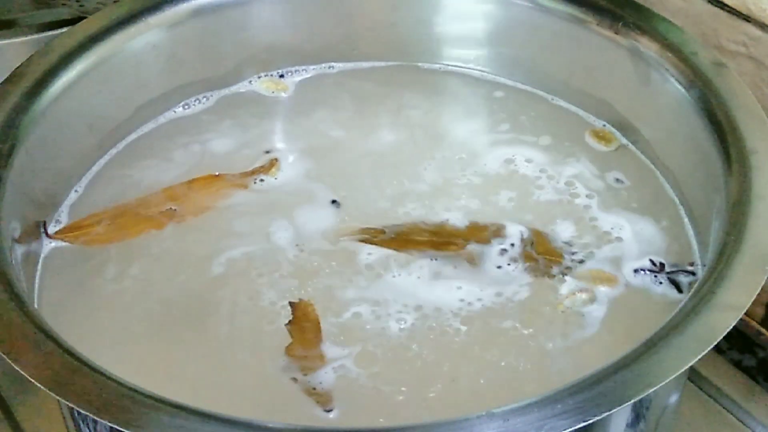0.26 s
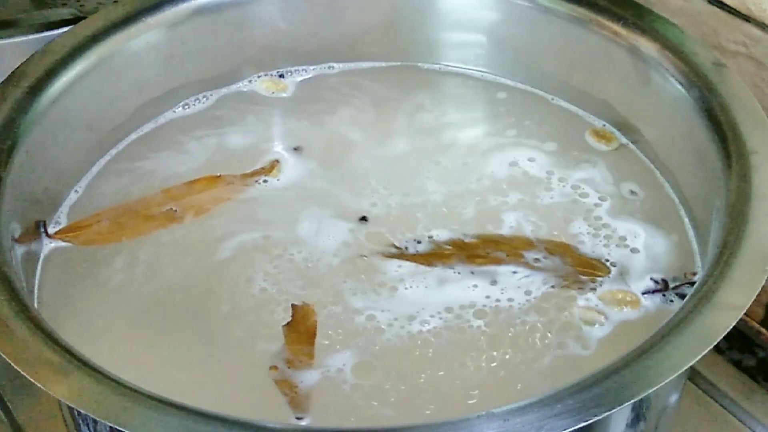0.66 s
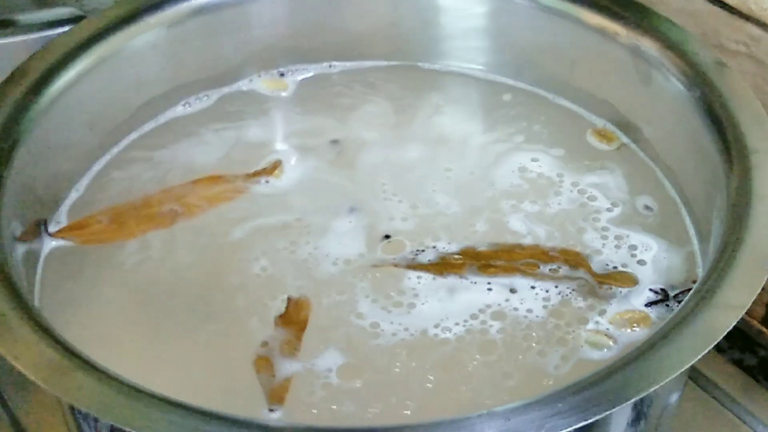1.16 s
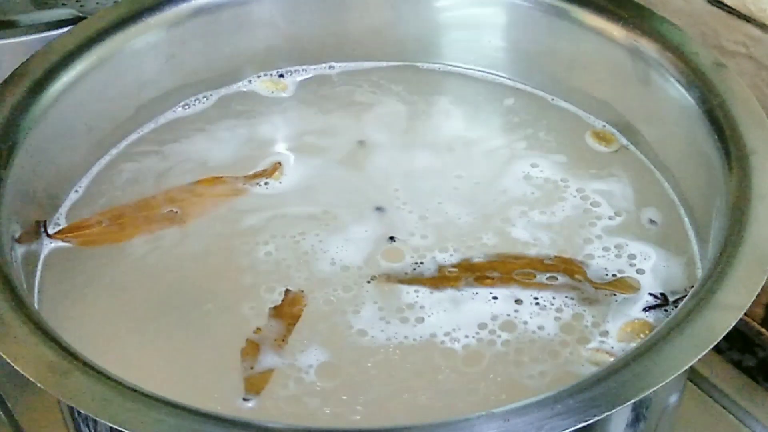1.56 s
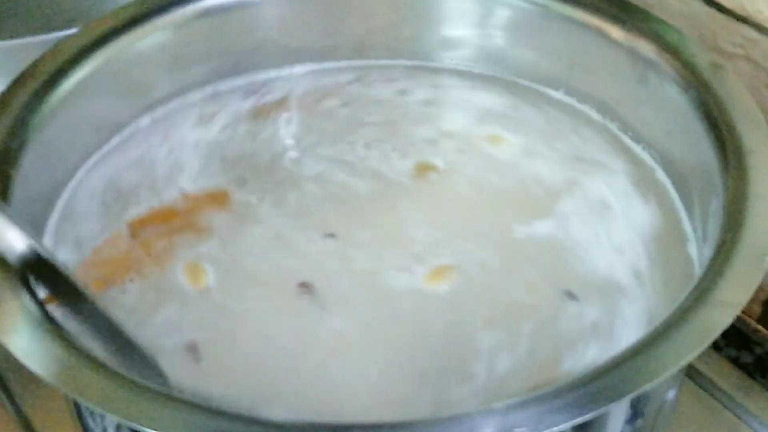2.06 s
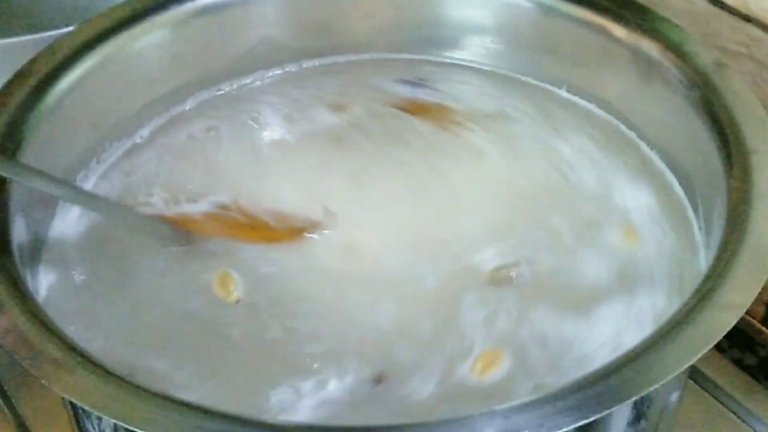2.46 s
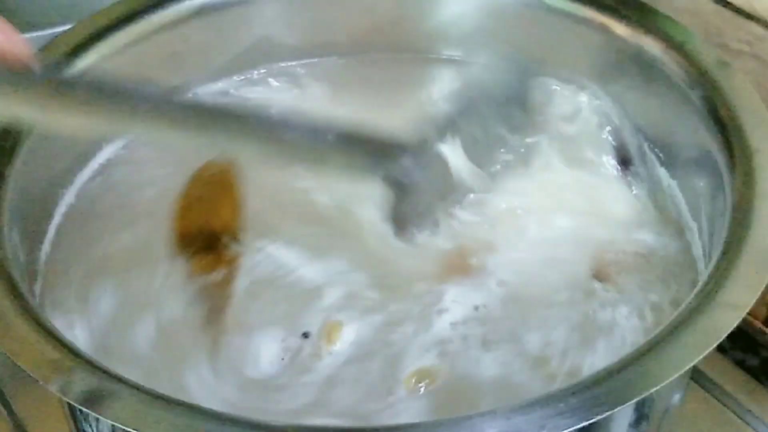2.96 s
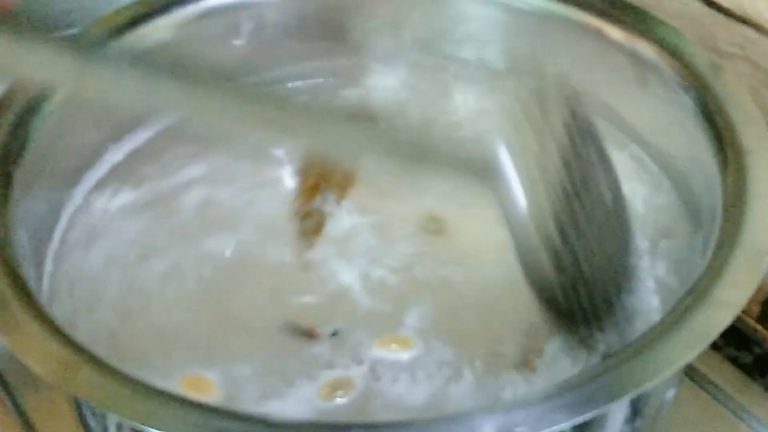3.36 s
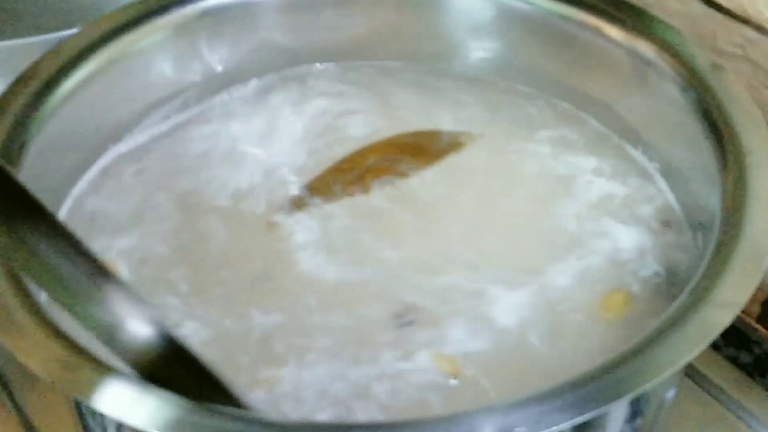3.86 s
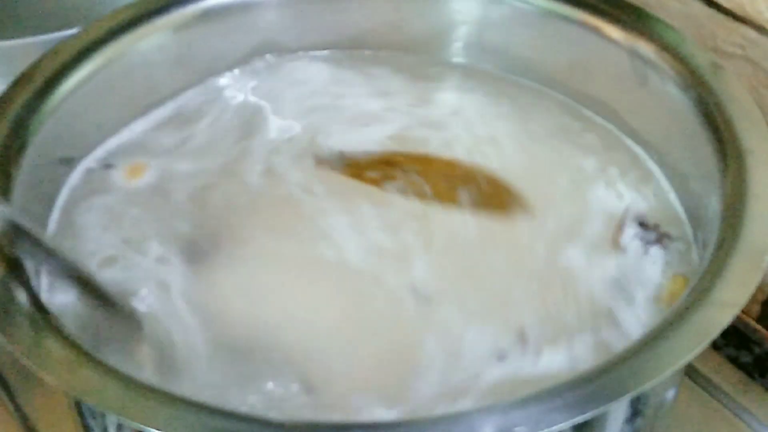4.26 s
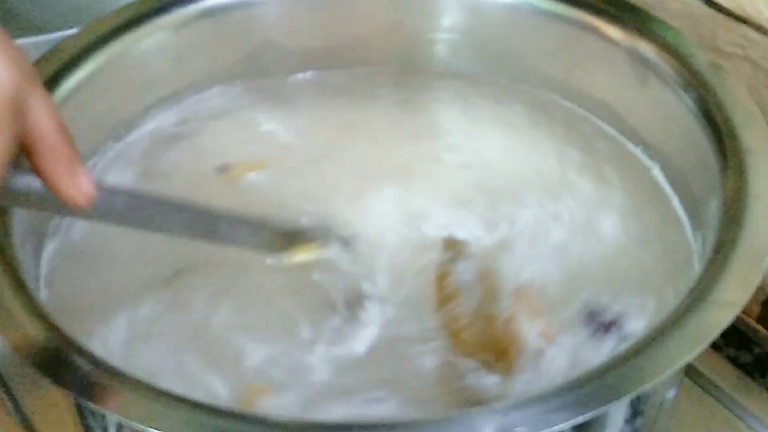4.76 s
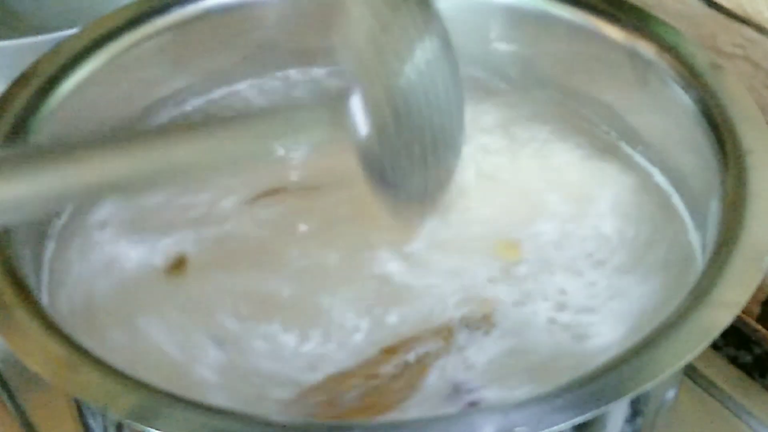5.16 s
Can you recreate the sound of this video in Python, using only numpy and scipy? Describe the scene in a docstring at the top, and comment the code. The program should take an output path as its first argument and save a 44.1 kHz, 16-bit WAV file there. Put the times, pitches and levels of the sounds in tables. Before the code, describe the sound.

Close-up kitchen stirring: bright steel taps and scratchy strokes against a pot, with soft watery pops over a thin, uneven simmer.

```python
"""Ladle scraping in a simmering pot

A steel ladle scrapes and clinks in a steel pot of simmering water and rice, close to a phone in a kitchen.
The water is uneven filtered noise, with short low pops, rising in pitch, where bass peaks break through the
gate; the steel is noise through resonances that wander at random, and struck modes that ring and decay.
The phone's noise suppressor thins what stays under its threshold, the bass is spared, and twice the sound
drops out for a moment."""
import sys
import numpy as np
from scipy import signal
from scipy.fft import rfft, irfft
from scipy.io import wavfile
from scipy.ndimage import uniform_filter1d

SR = 44100
rng = np.random.default_rng(int(sys.argv[2]) if len(sys.argv) > 2 else 0)


def inscribe(sig):
    """Save sig as 16-bit PCM at rate SR to the path in sys.argv[1].

    A 1-D sig is mono; a 2-D sig holds one channel per row.
    Samples are clipped to [-1, 1] before scaling.
    """
    pcm = np.round(np.clip(np.atleast_2d(sig).T, -1, 1) * 32767)
    wavfile.write(sys.argv[1], SR, pcm.astype(np.int16))


N = 239066  # length in samples


def undb(db):
    """dB to gain."""
    return 10 ** (np.asarray(db) / 20)


def unit(x):
    """Scaled to rms 1."""
    return x / np.sqrt(np.mean(x ** 2))


def band(x, lo_hz, hi_hz, order=5):
    """Band-pass between two frequencies."""
    edges = [lo_hz, min(hi_hz, .45 * SR)]
    return signal.sosfilt(signal.butter(order, edges, "band", fs=SR, output="sos"), x)


def gains(spans):
    """Gain curve from (from s, to s, start dB, end dB) spans; overlapping spans add their power."""
    t = np.arange(N) / SR
    power = np.zeros(N)
    for start, end, start_db, end_db in spans:
        inside = (t >= start) & (t < end)
        power[inside] += undb(np.linspace(start_db, end_db, num=inside.sum())) ** 2
    return uniform_filter1d(np.sqrt(power), size=70)


def flicker(rate, spread_db):
    """A gain that wanders at random in dB: random steps, rate per second, smoothed twice."""
    k = int(SR / rate)
    steps = np.repeat(rng.standard_normal(N // k + 1), k)
    smooth = uniform_filter1d(uniform_filter1d(steps, k), k)[:N]
    return undb(0.91 * spread_db * smooth)


def resonate(x, modes, between_db):
    """Resonance peaks over an even response."""
    f = np.fft.rfftfreq(N, 1 / SR)
    peaks = sum(undb(db) / (1 + 2j * (f - hz) / width) for hz, width, db in modes)
    return irfft(rfft(x) * (undb(between_db) + peaks), N)


def add(out, s, x):
    """Mix x into out from time s."""
    i = int(s * SR)
    out[i:i + len(x)] += x[:N - i]


# Spectrum of the boil. Each row: frequency in Hz, relative level in dB.
RUMBLE_SPECTRUM = [(15, -61), (25, -33), (61, -10), (135, -9), (212, -9), (251, -10.5), (302, -8.5),
                   (690, -15), (1400, -12.5), (1820, -64), (3080, -120)]
# Resonances of the water. Each row: frequency in Hz, width in Hz, relative level in dB.
WATER_MODES = [(146.7, 9.2, -4), (191, 10, -7.5), (251.1, 16, 2), (442, 2.5, -18.5), (609, 12, -10),
               (830, 2.6, -5.5)]
# Steps in the level of the water sound, as the recorder's gate opens and closes, each held until the next.
# Each row: start in seconds, rumble level in dB, gurgle and fine gurgle levels in dB relative to the rumble.
WATER_STEPS = [(0.0, -52.5, -26, -21), (0.065, -51, -27, -30), (0.236, -48, 2, -36),
               (0.377, -56.5, -18, -27.5), (0.795, -49.5, -24.5, -23.5), (1.214, -50, -13, -10.5),
               (1.331, -58.5, -25, -25), (1.735, -47, 0, -4), (2.388, -54.5, -4.5, -9.5),
               (2.83, -54, -3, -4), (3.148, -46, -5, -8.5), (4.434, -53.5, 0, -9), (4.846, -53, -2.5, -16),
               (5.05, -53.5, -4, -13.5), (5.33, -41.5, -9, -12)]
# Short swells of the low water sound, some where the gate opens. Each row: start in seconds,
# length in seconds, starting levels of rumble, gurgle and fine gurgle in dB.
SWELLS = [(0.071, 0.039, -70, -54, -72), (0.535, 0.082, -64.5, -79, -73), (0.902, 0.14, -72, -72, -59.5),
          (1.355, 0.11, -61, -58, -67), (1.623, 0.034, -59, -58, -77), (2.154, 0.14, -47, -36, -34),
          (2.703, 0.1, -77, -56, -46.5), (2.916, 0.076, -60, -58, -57), (3.338, 0.17, -51.5, -42, -46),
          (4.165, 0.15, -46.5, -29.5, -32), (4.622, 0.041, -45, -55, -61), (4.764, 0.021, -60, -50, -42.5),
          (4.801, 0.038, -47, -38, -50), (5.094, 0.015, -53, -50, -65)]
# Fall of a swell over its length. One row: rumble, gurgle and fine gurgle in dB.
SWELL_FADE_DB = (1, 30.5, 32)


def simmer():
    """Boiling shakes the pot: uneven low noise in the resonances of the water."""
    f = np.maximum(np.fft.rfftfreq(N, 1 / SR), 1)
    hz, db = np.transpose(RUMBLE_SPECTRUM)
    spectrum = undb(np.interp(np.log(f), np.log(hz), db))
    noise = irfft(rfft(rng.standard_normal(N)) * spectrum, N)
    noise = resonate(noise * flicker(45, 2.0), WATER_MODES, -16)
    ends = [row[0] for row in WATER_STEPS[1:]] + [N / SR]
    out = 0
    # rumble, gurgle, fine gurgle
    for k, (lo_hz, hi_hz) in enumerate([(25, 368), (370.7, 684), (692, 1040)]):
        held = []
        for row, end in zip(WATER_STEPS, ends):
            level_db = row[1] + (row[k + 1] if k else 0)
            held.append((row[0], end, level_db, level_db))
        swells = []
        for row in SWELLS:
            start, length, start_db = row[0], row[1], row[k + 2]
            swells.append((start, start + length, start_db, start_db - SWELL_FADE_DB[k]))
        # only the gurgles flicker here
        uneven = flicker(22.16, 5.5) if k else 1
        layer = unit(band(noise, lo_hz, hi_hz, order=5 if k < 2 else 2))
        out = out + layer * (gains(held) * uneven + gains(swells))
    return out


# Low pops where bass peaks break through the gate. Each row: start in seconds, level in dB before a common
# 4 dB lift, starting pitch in Hz, relative length of the decay (1 = 1.6 cycles).
POPS = [(0.377, -40.5, 285, 0.24), (1.212, -52, 253, 0.94), (1.223, -33, 233, 0.75),
        (1.243, -42, 232, 0.41), (1.27, -37.5, 246, 0.92), (1.297, -37, 220, 0.69), (1.325, -46, 235, 0.77),
        (1.625, -39.5, 206, 0.42), (2.441, -36, 157, 0.31), (2.559, -46, 134, 1), (2.586, -46.5, 342, 0.74),
        (2.648, -35, 245, 0.56), (2.687, -43.5, 220, 0.74), (2.706, -35.5, 194, 0.29),
        (2.732, -36, 250, 0.68), (2.834, -42.5, 343, 0.52), (2.847, -31.5, 218, 0.31),
        (2.888, -40.5, 124, 1), (2.901, -34, 298, 0.49), (2.911, -30, 217, 0.25), (2.959, -42, 277, 1),
        (2.985, -35.5, 246, 0.89), (2.999, -38, 230, 0.82), (3.043, -36.5, 155, 0.44),
        (3.077, -35.5, 181, 0.45), (3.09, -32.5, 414, 0.58), (3.119, -38, 156, 0.6),
        (3.127, -35, 440, 0.36), (4.5, -37.5, 535, 0.41), (4.533, -34, 394, 0.51),
        (4.549, -38.5, 145, 0.72), (4.626, -46, 234, 0.81), (4.676, -35, 225, 0.34),
        (4.704, -43, 240, 0.78), (4.764, -37, 332, 0.95), (4.794, -32.5, 315, 0.6),
        (4.889, -36, 249.5, 0.97), (4.904, -35.5, 255, 0.38), (5.093, -40.5, 320, 0.75),
        (5.226, -33.5, 306, 0.41), (5.276, -41, 183, 1), (5.334, -54, 256, 0.81)]


def pops():
    """Short low pops, rising in pitch: a decaying sine with a little noise on it."""
    out = np.zeros(N)
    for s, db, hz, cycles in POPS:
        length = min(int(12 * SR / hz), 3000)
        turns = np.arange(length) * hz / SR  # cycles at the starting pitch
        swell = (1 - np.exp(-turns / .12)) * np.exp(-turns / (1.6 * max(cycles, .1)))
        noise = band(rng.standard_normal(length), 340, 788, order=2)
        tone = np.sin(2 * np.pi * turns * (1 + 0.0563 * turns))
        add(out, s, undb(db + 4.0) * swell * (tone + 2.48 * noise))
    return band(out, 36, 1400, order=2)


# Level of the thin tone, gliding from row to row. Each row: time in seconds, level in dB.
WHINE_LEVELS = [(0.15, -91), (0.238, -84), (0.242, -63), (0.346, -59), (0.54, -91), (0.68, -89),
                (0.79, -66.5)]


def whine():
    """A thin flickering tone: a sine at one pitch that lingers after a tap."""
    spans = [(s0, s1, db0, db1) for (s0, db0), (s1, db1) in zip(WHINE_LEVELS, WHINE_LEVELS[1:])]
    tone = np.sqrt(2) * np.sin(2 * np.pi * 3900 * np.arange(N) / SR)  # 3900 Hz, rms 1
    return tone * flicker(37, 2.1) * gains(spans)


# Times when the handle, not the bowl, touches the pot. Each row: start in seconds, end in seconds.
ON_RIM = [(0, 1.7), (2.6, 2.9), (4.9, 5.03)]


def on_rim(s):
    """True while the handle touches the rim."""
    return sum((s >= start) & (s < end) for start, end in ON_RIM) > 0


def ring(modes, t, damping):
    """Decaying modes, each starting at its own phase; damping divides each decay time; peak 1."""
    phases = rng.uniform(0, 2 * np.pi, len(modes))
    x = 0
    for (hz, db, t60), phase in zip(modes, phases):
        decay = np.exp(-np.log(1000) * damping * t / t60)
        x = x + undb(db) * decay * np.sin(2 * np.pi * hz * t + phase)
    return x / np.max(np.abs(x))


# Ring of ladle bowl and pot wall. Each row: pitch in Hz, relative level in dB, t60 in seconds before damping.
BOWL_RING = [(1287, -20, 0.46), (1680, 0, 0.34), (2099, -16, 0.52), (2266, -12, 0.58), (2670, -17, 0.42),
             (3338, -18, 0.5), (4689, -25, 0.37), (4980, -21, 0.45), (5749, -5, 0.15), (6115, -6, 0.71),
             (6390, -5, 0.2), (6605, -12, 0.37), (6853, -17, 0.66), (7192, -7, 0.2), (7321, -21, 0.78),
             (7967, -11, 0.24), (8312, -24, 1.3), (8603, -16, 0.36), (8909, -20, 0.45), (9044, -23, 0.52)]
# Ring of the handle on the rim. Each row: pitch in Hz, relative level in dB, t60 in seconds before damping.
RIM_RING = [(2410, -1.5, 0.12), (3770, -16, 0.22), (4100, -18.5, 0.8), (5900, -16, 0.34), (8200, -7.5, 1),
            (7946, -15.5, 0.27), (9600, -8.5, 0.28), (11450, -6, 0.38), (10600, -3.5, 0.21),
            (12420, -9, 0.25), (13440, -9, 0.21), (14820, -32.5, 0.48)]
# Pot floor under water. Each row: pitch in Hz, relative level in dB, t60 in seconds before damping.
THUD = [(231, 7.5, 0.26), (476, -34.5, 1.4), (522, -27, 1.1), (600, -10, 0.14), (764, -0.5, 0.041)]
# Blows of the ladle. Each row: time in seconds, crack peak in dB, crack pitch in Hz (its noise band runs
# from 1/2.05 to 1.33 times this), thud and ring levels in dB relative to the crack,
# damping factor of the rattle and of the handle's ring.
BLOWS = [(0.073, -46, 10200, -24, -30.5, 2.2), (0.211, -47.5, 10770, -11, -16, 2.2),
         (0.2367, -28.5, 9970, -27, -13, 1.9), (0.7935, -34, 4380, -25.5, -18, 3.6),
         (0.8028, -22, 7940, -35, -42, 2.2), (0.854, -36, 7110, -28, -26.5, 1.7),
         (0.898, -38, 7700, -18.5, -14.5, 1.9), (0.993, -37, 8060, -19, -17, 2.5),
         (2.155, -29.5, 2800, -1, -39, 2), (2.7046, -29.5, 6900, -12, -15.5, 2.5),
         (3.1484, -12, 7300, -34.5, -21.5, 1.5), (3.1672, -20.5, 3280, -28, -15, 2.2),
         (3.182, -27, 3273, -32, -16.5, 1.2), (3.3397, -4, 7280, -32.5, -13.5, 1.1),
         (4.1635, -34, 2640, -0.5, -38, 2), (4.9353, -28, 8200, -13.5, -7, 1.55),
         (5.4092, -27, 8400, -1.5, -7, 2)]


def blows():
    """A crack and short rattle of noise, the ring of the steel and the thud of the pot."""
    out = np.zeros(N)
    t = np.arange(SR // 2) / SR
    rise = 1 - np.exp(-t / .0002)
    for s, db, hz, thud_db, ring_db, damping in BLOWS:
        noise = band(rng.standard_normal(len(t)), hz / 2.05, hz * 1.33, order=2)
        rattle = undb(-9.5) * np.exp(-t * damping / 0.0027)
        crack = rise * noise * (np.exp(-t / 0.00049) + rattle)
        # the hand damps the handle; the bowl rings free
        steel = ring(RIM_RING, t, damping) if on_rim(s) else ring(BOWL_RING, t, 0.88)
        body = undb(ring_db) * steel + undb(thud_db) * ring(THUD, t, 4.6)
        blow = undb(db) * (crack / np.max(np.abs(crack)) + rise * body)
        # no ring lasts across a dropout
        left_s = min([end - s for _, end in DROPOUTS if end > s] + [1])
        add(out, s - .0005, blow[:int((left_s - .01) * SR)])
    return out


def rubbed(modes, crowd_db):
    """Uneven noise through resonances whose levels wander at random, as under a noise suppressor."""
    slips = rng.standard_normal(N) * undb(1.7 * rng.exponential(size=N)) * flicker(70, 1.6)
    # a crowd of weaker, mostly broader resonances lies between the clear ones
    crowd_hz = np.linspace(1300, 15800, num=50) + rng.uniform(-120, 120, size=50)
    crowd = [(hz, 200, crowd_db) for hz in crowd_hz]
    out = 0
    for hz, width, db in list(modes) + crowd:
        resonance = signal.lfilter(*signal.iirpeak(hz, hz / width, SR), slips)
        out = out + undb(db) * flicker(7, 4.6) * resonance
    return unit(out)


# Ladle bowl in the pot. Each row: resonance in Hz, width in Hz, relative level in dB.
BOWL_STEEL = [(1703, 26, 4), (2025, 45, -17.5), (2300, 34, -2.5), (2930, 120, -10.5), (3562, 21, 1.5),
              (4000, 53, -8), (5160, 33, -4.5), (5700, 8, -9.5), (6270, 57, -2), (6777, 78, 1.5),
              (7570, 32, 0.5), (8010, 270, -6.5), (7600, 390, -13), (8600, 28, -29), (10400, 51, -8.5),
              (10500, 89, -21.5), (10900, 37, -8.5), (10660, 54, -21.5), (11170, 25, -27),
              (11030, 34, -31.5), (12400, 93, -21), (12530, 60, -38), (13100, 67, -40), (14600, 82, -33.5)]
# Handle on the rim. Each row: resonance in Hz, width in Hz, relative level in dB.
RIM_STEEL = [(2290, 22, -28), (2700, 27, -26.5), (3260, 200, -26), (3904, 61, -11), (3760, 47, -7.5),
             (4370, 66, -17.5), (5900, 24, -10), (6340, 100, -13.5), (7410, 270, -1.5), (8460, 360, -8.5),
             (9730, 94, -6.5), (10400, 110, -6), (11500, 430, -6), (11600, 49, -6.5), (12400, 240, -13),
             (12800, 370, -19), (13900, 140, -23), (14400, 100, -16.5), (15400, 180, -14.5)]
# Eight adjoining bands of the rubbed steel, from low to high. Each row: low edge in Hz, high edge in Hz.
STEEL_BANDS_HZ = [(1000, 1450), (1450, 2200), (2200, 3600), (3600, 4600), (4600, 6700), (6700, 9450),
                  (9450, 12150), (12150, 16000)]
# Mix of those bands with the bowl in the pot. Each entry: level in dB.
BOWL_BANDS_DB = [-6, -0.6, -1, -8, 0, 3.5, -6, -5.5]
# Mix of those bands with the handle on the rim. Each entry: level in dB.
RIM_BANDS_DB = [-7.5, 1.4, -4.5, -4.5, -1.5, 6.5, -1.4, -6.5]
# Layers of scraping noise, several to a stroke, some faint leaks through the suppressor.
# Each row: start in seconds, end in seconds, relative start and end levels in dB,
# bend of the fade (1 = even, more = quick change first), low edge of the range in octaves over 1 kHz,
# its top edge at the start and at the end in octaves over 1 kHz.
SCRAPE_LAYERS = [(0.056, 0.231, -56, -56, 2, 2.8, 4.7, 3.95),
                 (0.076, 0.233, -46.5, -46, 0.7, 3.24, 4.4, 3.5),
                 (0.07, 0.235, -66, -68, 1.1, 2.3, 1.8, 1.9),
                 (0.238, 0.35, -50.5, -72, 1.1, 1.15, 2.2, 1.5),
                 (0.233, 0.368, -41.5, -61, 1.6, 2.42, 3.6, 3.3),
                 (0.417, 0.524, -52.5, -80, 0.48, 1.33, 2.48, 2.64),
                 (0.795, 0.852, -42, -50.5, 0.55, 1.41, 3.23, 3.06),
                 (0.852, 0.99, -39, -50, 3.1, 2.21, 3.9, 4.1),
                 (0.854, 1.128, -56.5, -64.5, 1.1, 1.15, 3.2, 2.4),
                 (0.991, 1.128, -39.5, -58, 1.3, 2.43, 4.1, 3.7),
                 (1.084, 1.322, -51, -73, 0.46, 3.02, 3.4, 2.64),
                 (1.124, 1.255, -48.5, -69.5, 0.64, 0.18, 6, 2.9),
                 (1.263, 1.364, -60, -68, 0.57, 1.97, 1.8, 2.6),
                 (1.418, 1.514, -57, -75, 0.42, 1.1, 2.52, 1.96),
                 (1.553, 1.619, -49.5, -69.5, 0.89, 0.5, 1.05, 1.4),
                 (1.735, 2.153, -43.5, -61, 0.18, 0.19, 3.44, 2.86),
                 (1.737, 1.8, -46, -72, 1.5, 6.2, 5.1, 5),
                 (2.154, 2.369, -43.5, -68.5, 1.6, 0.2, 2.47, 0.26),
                 (2.16, 2.369, -40.5, -66.5, 1.4, 3.33, 2.87, 2.78),
                 (2.153, 2.273, -51, -85, 1.1, 1.1, 3.02, 2.7),
                 (2.698, 2.754, -51, -55, 0.37, 1.5, 3.64, 2.73),
                 (2.673, 2.795, -56, -76, 0.6, 1.3, 1.8, 2.05),
                 (2.759, 2.856, -45.5, -74, 1.2, 3.08, 2.54, 2.85),
                 (3.146, 3.332, -38, -50, 1.9, 0.3, 5, 4.05),
                 (3.336, 3.642, -28, -65.5, 1.86, 0.77, 3.7, 3.8),
                 (3.34, 4.032, -43.5, -61.5, 0.23, 0.32, 3.5, 2.78),
                 (3.939, 4.156, -66, -52, 5, 1.3, 2.3, 3.25),
                 (4.161, 4.428, -43.5, -63.5, 2.75, 0.17, 2.62, 0.27),
                 (4.167, 4.298, -47.5, -79, 0.84, 0.65, 2.9, 2.9),
                 (4.168, 4.422, -50, -93, 0.85, 2.8, 3.9, 3.6),
                 (4.672, 4.787, -59, -67.5, 0.9, 1.55, 1.9, 2.1),
                 (4.673, 4.824, -51, -73, 0.98, 1.55, 3.07, 2.7),
                 (4.747, 4.84, -64, -75, 0.9, 0.2, 1.2, 1.1),
                 (4.934, 5.011, -42.5, -53.5, 1.24, 1.5, 4.5, 3.7),
                 (5.333, 5.419, -57, -49, 1, 0.55, 2.57, 1.92),
                 (5.334, 5.42, -43, -60, 1.3, 3.08, 4.9, 4.3)]


def scrape():
    """The rubbed steel: each layer sounds a range of it, whose ragged top glides along the layer."""
    rim = on_rim(np.arange(N) / SR)
    rubbing = np.where(rim, rubbed(RIM_STEEL, -15.5), rubbed(BOWL_STEEL, -8.5))
    steel = 0
    for (lo_hz, hi_hz), rim_db, bowl_db in zip(STEEL_BANDS_HZ, RIM_BANDS_DB, BOWL_BANDS_DB):
        steel = steel + unit(band(rubbing, lo_hz, hi_hz)) * np.where(rim, undb(rim_db), undb(bowl_db))
    f, t, z = signal.stft(steel, SR, nperseg=256, noverlap=128)
    fray = unit(uniform_filter1d(rng.standard_normal(z.shape), size=28, axis=1))
    scatter = fray - 1
    octave = np.log2(np.maximum(f, 1) / 1000)[:, None]
    power = np.zeros(z.shape)
    for start, end, start_db, end_db, bend, low, top_start, top_end in SCRAPE_LAYERS:
        inside = (t >= start) & (t < end)
        left = (end - t[inside]) / (end - start)  # share of the layer still to come
        top = top_end + (top_start - top_end) * left + 0.14 * fray[:, inside]
        # fall outside the edges, in dB per octave
        outside_db = 35.5 * np.maximum(low - octave, 0) + 68.5 * np.maximum(octave - top, 0)
        db = end_db + (start_db - end_db) * left ** max(bend, .2)
        # below -40 dB the sound grows patchy, as if through a noise suppressor
        patches = 0.4032 * np.clip(-40 - db, 0, 15) * scatter[:, inside]
        power[:, inside] += undb(db + patches - outside_db) ** 2
    # a dip that glides up through the first long stroke: seconds, then octaves over 1 kHz
    hollow = np.interp(t, (1.73, 2.155), (1.99, 2.2), left=-9, right=-9)
    hollow_db = -14.5 * np.exp(-((octave - hollow) / 0.11) ** 2)
    shaped = z * np.sqrt(power) * undb(hollow_db)
    return signal.istft(shaped, SR, nperseg=256, noverlap=128)[1][:N]


def scene():
    """All sources, one microphone."""
    return (simmer() + pops() + whine() + blows() + scrape())[None]


def suppress(x, threshold_db, memory):
    """Noise suppressor: each narrow band passes only while its recent power stands over a threshold."""
    f, _, z = signal.stft(x, SR, nperseg=512, noverlap=384)
    recent = signal.lfilter([1 - memory], [1, -memory], np.abs(z) ** 2, axis=1)
    gain = 1 / (1 + (undb(threshold_db) ** 2 / (recent + 1e-20)) ** 2)
    bass_floor = np.minimum((800 / np.maximum(f, 1)) ** 5, 1)[:, None]  # the bass is spared
    return signal.istft(z * np.maximum(gain, bass_floor), SR, nperseg=512, noverlap=384)[1][:N]


def gate(x, open_db, depth_db, slope):
    """A quick noise gate: quiet moments sink further, so that low peaks pop out."""
    level_db = 10 * np.log10(uniform_filter1d(x ** 2, size=260) + 1e-14)
    cut_db = np.clip(slope * (level_db - open_db), -depth_db, 0)
    return x * undb(uniform_filter1d(cut_db, size=60))


# Moments when the sound drops out. Each row: start in seconds, end in seconds.
DROPOUTS = [(1.681, 1.736), (5.015, 5.05)]


def record(dry):
    """Suppressor, gate, a faint hiss that rides on the level of the sound, dropouts, top cut."""
    x = gate(suppress(dry[0], -77.5, 0.97), open_db=-47, depth_db=4.3, slope=2.6)
    envelope = np.sqrt(uniform_filter1d(x ** 2, size=110) + 1e-12)
    hiss = band(rng.standard_normal(N), 900, 13000, order=1)
    hiss = hiss + undb(5.5) * band(rng.standard_normal(N), 1100, 1300, order=1)
    x = x + undb(-47.5) * envelope ** 0.57 * hiss
    live = np.ones(N)
    for start, end in DROPOUTS:
        live[int(start * SR):int(end * SR)] = 0
    x = x * uniform_filter1d(live, size=60)
    top_cut = signal.ellip(10, .2, 70, 15800, fs=SR, output="sos")  # low-pass at 15800 Hz
    return signal.sosfilt(top_cut, x)[None]


dry = scene()
out = record(dry)
inscribe(out)
```